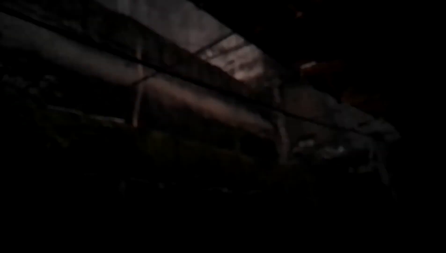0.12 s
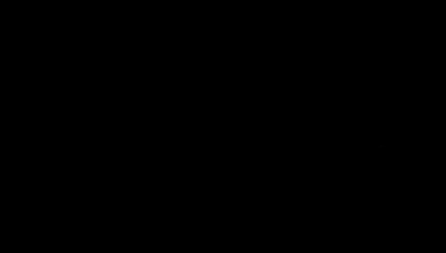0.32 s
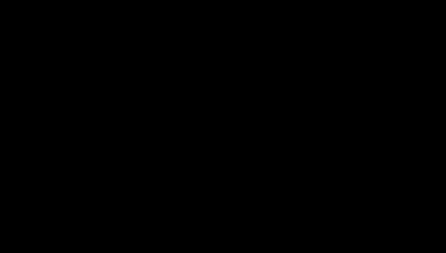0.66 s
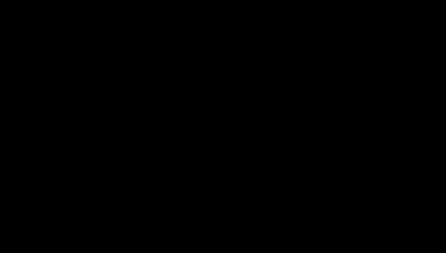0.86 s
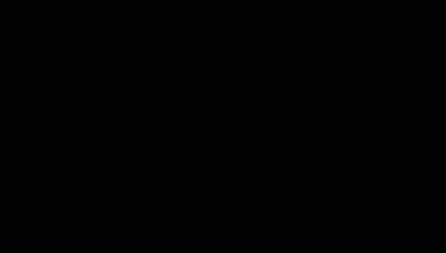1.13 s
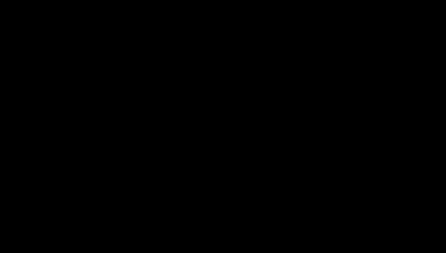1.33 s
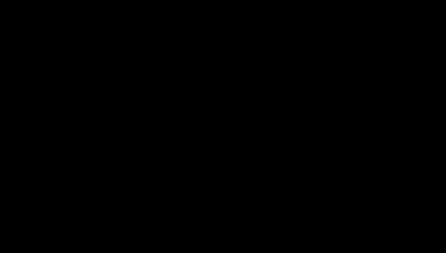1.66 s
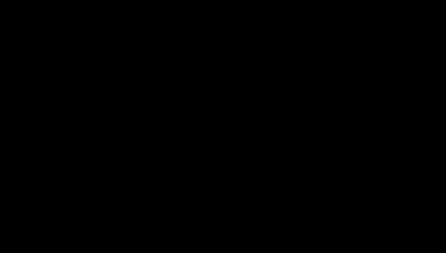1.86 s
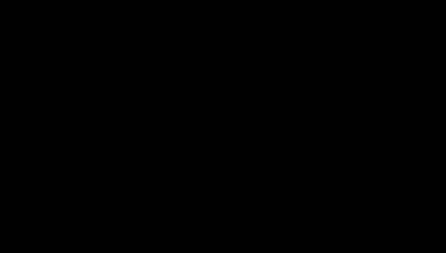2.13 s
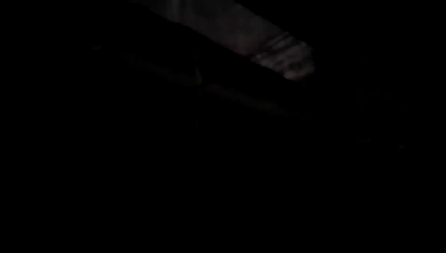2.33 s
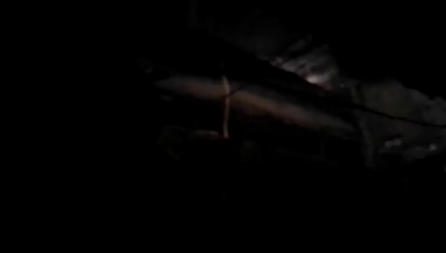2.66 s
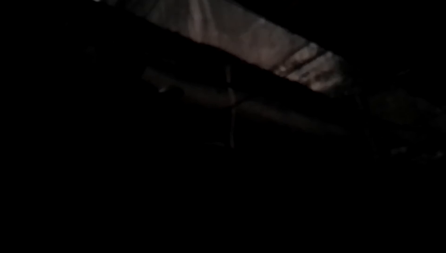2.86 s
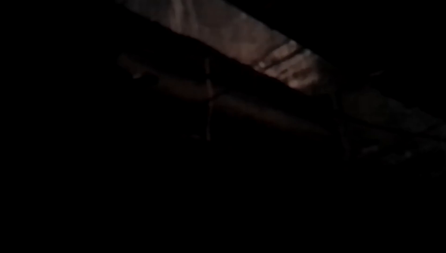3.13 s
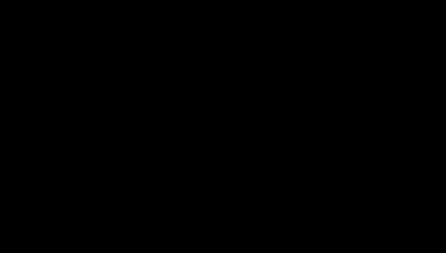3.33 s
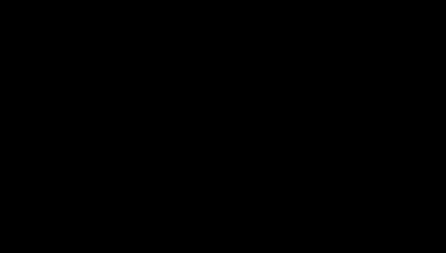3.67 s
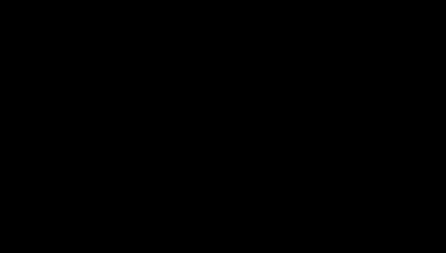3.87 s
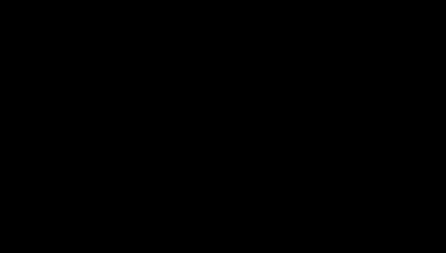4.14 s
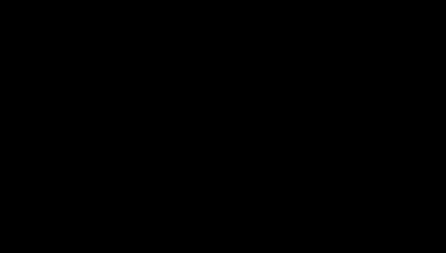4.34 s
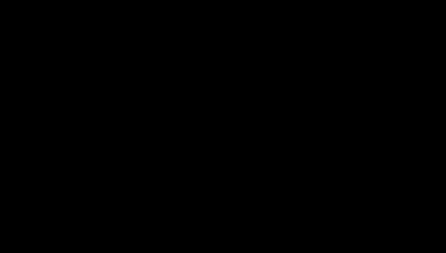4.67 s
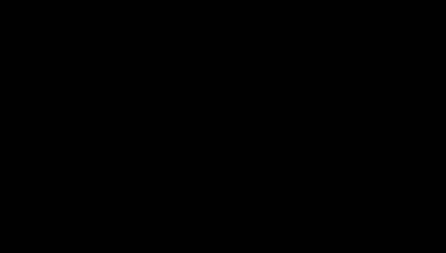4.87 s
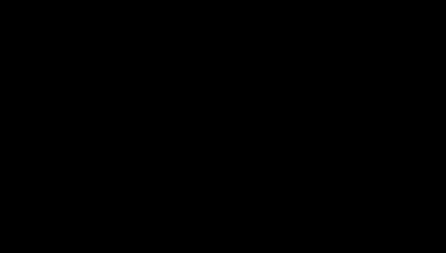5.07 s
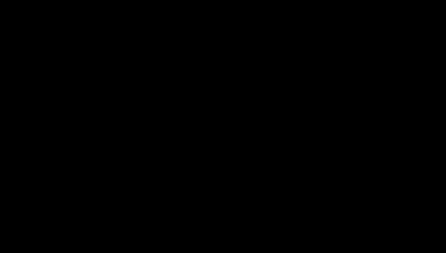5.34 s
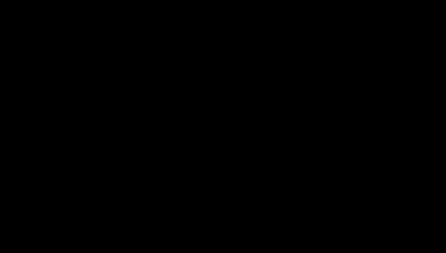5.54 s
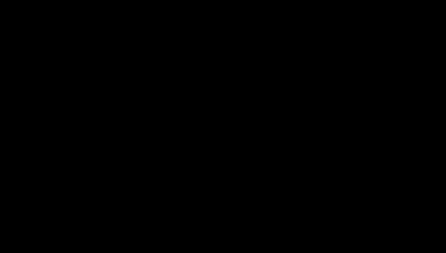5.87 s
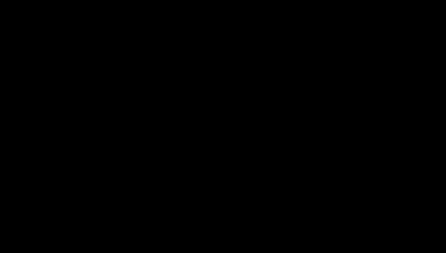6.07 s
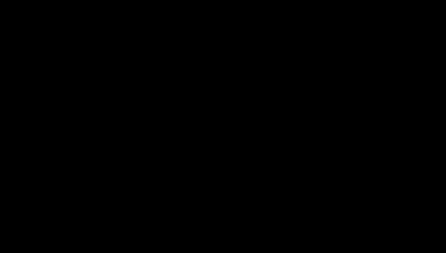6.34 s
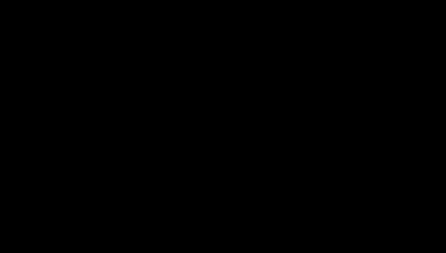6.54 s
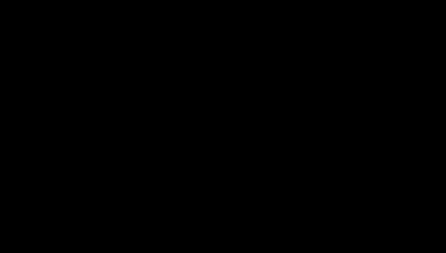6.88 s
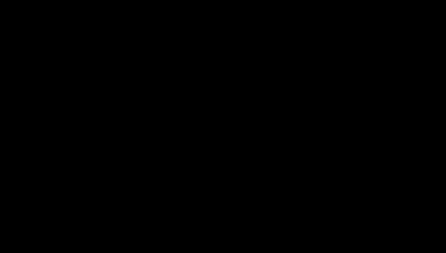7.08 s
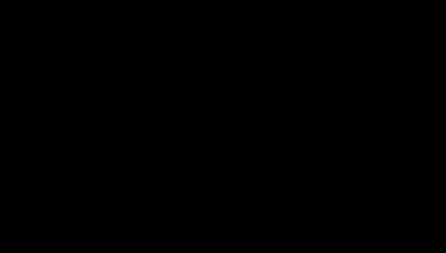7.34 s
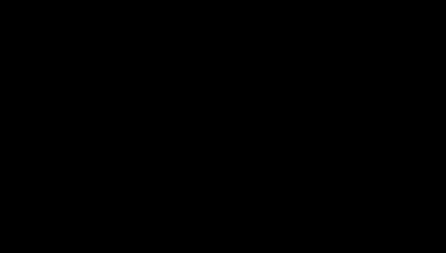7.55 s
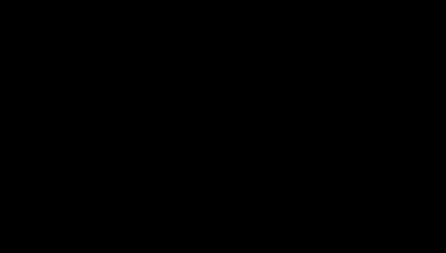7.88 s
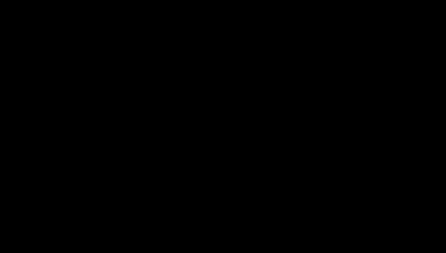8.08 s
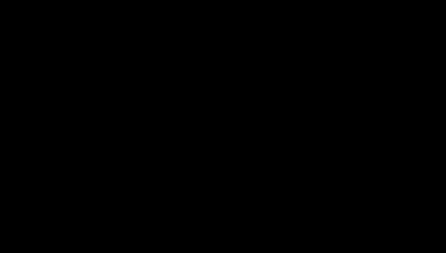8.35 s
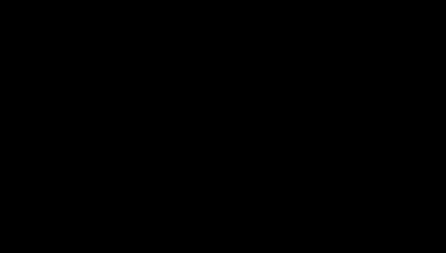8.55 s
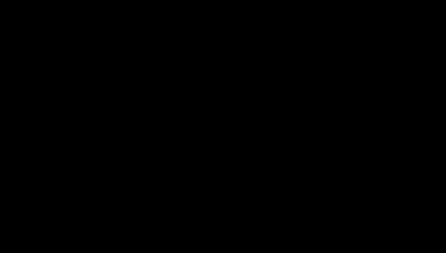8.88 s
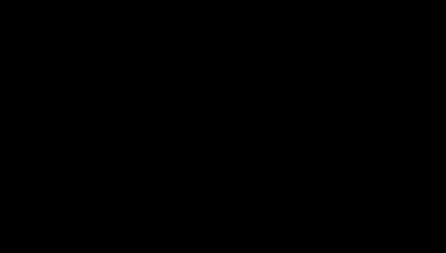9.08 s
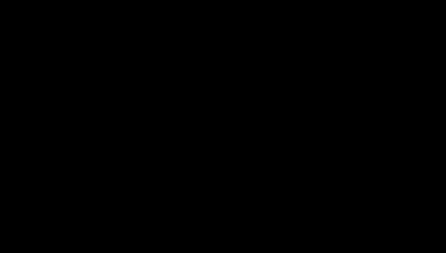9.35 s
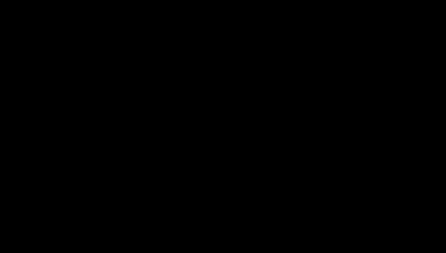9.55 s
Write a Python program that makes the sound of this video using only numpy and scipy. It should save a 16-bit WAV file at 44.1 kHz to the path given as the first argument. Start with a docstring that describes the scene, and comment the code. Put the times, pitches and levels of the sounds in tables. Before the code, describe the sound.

Steady night rain with close, crisp drips, as a low peal of thunder rolls in, dies away and returns in softer rumbles.

```python
"""Steady night rain from a sheltered spot: drips ring close by, over a patter of small drops and a far hiss.
Each drip splats and rings the surface it lands on; the near drops echo off the walls.
Thunder rolls in as scattered low shocks, twice loud and then in soft rumbles; the first roll shakes
something loose, which rattles and clicks. Late on, water spatters briefly on something thin."""
import sys
import numpy as np
from scipy import signal
from scipy.fft import rfft, irfft, next_fast_len
from scipy.io import wavfile
from scipy.ndimage import uniform_filter1d

SR = 44100
rng = np.random.default_rng(int(sys.argv[2]) if len(sys.argv) > 2 else 0)


def pcm_store(signal):
    """Save signal as 16-bit PCM."""
    levels = np.round(np.clip(np.atleast_2d(signal), -1, 1) * 32767)
    wavfile.write(sys.argv[1], SR, levels.astype(np.int16).T)


N = 428211


def undb(db):
    """Decibels to gain."""
    return 10 ** (np.asarray(db) / 20)


def level(x, db):
    """Scale to an rms level."""
    return x * undb(db) / np.sqrt(np.mean(x ** 2))


def equal_energy(rows):
    """Give every row the mean energy of all rows."""
    power = np.mean(rows ** 2, axis=1, keepdims=True)
    return rows * np.sqrt(power.mean() / power)


def colour(x, points):
    """EQ through (Hz, dB) points on a log axis."""
    size = next_fast_len(len(x))
    hz = np.arange(size // 2 + 1) * SR / size + 1
    point_hz, point_db = np.transpose(points)
    curve = undb(np.interp(np.log(hz), np.log(point_hz), point_db))
    return irfft(rfft(x, size) * curve, size)[:len(x)]


def band(x, lo_hz, hi_hz, order=3):
    """Butterworth band-pass."""
    return signal.sosfilt(signal.butter(order, [lo_hz, hi_hz], "band", fs=SR, output="sos"), x)


def ring(x, hz, width_hz):
    """Two like resonators in series, with gain 1 at the centre."""
    peak = signal.iirpeak(hz, hz / max(width_hz, 5), SR)
    return signal.lfilter(*peak, signal.lfilter(*peak, x))


def waver(rate_hz):
    """Random levels held 1 / rate s and smoothed twice; spread near 1."""
    hold = int(SR / rate_hz)
    steps = np.repeat(rng.standard_normal(N // hold + 1), hold)
    return 1.3 * uniform_filter1d(uniform_filter1d(steps, hold), hold)[:N]


def clicks(count, spread_db, top_db=14):
    """Impulses at random moments; the spread makes a few of them large, up to a top."""
    when, polarity, chance = rng.random((count, 3)).T
    size = undb(np.minimum(-spread_db * np.log(1 - chance), top_db))
    out = np.zeros(N)
    np.add.at(out, (when * N).astype(int), np.sign(polarity - .5) * size)
    return out


def decay(x, t60):
    """Give every impulse an exponential tail."""
    return signal.lfilter([1], [1, -np.exp(-np.log(1000) / (t60 * SR))], x)


def swells(starts, levels_db, holds, rise_db_s, fall_db_s):
    """Envelope of overlapping events that rise to their start time, hold and fall."""
    t = np.arange(0, N + 96, 96) / SR
    start, db, hold = (np.asarray(v)[:, None] for v in (starts, levels_db, holds))
    db = db - rise_db_s * np.maximum(start - t, 0) - fall_db_s * np.maximum(t - start - hold, 0)
    return np.interp(np.arange(N) / SR, t, np.sqrt(np.sum(undb(db) ** 2, axis=0)))


def hiss():
    """Far rain: countless drops merged; the treble flickers more than the rest."""
    # tone of the far rain (frequency [Hz], gain [dB])
    eq = [(15, -38), (25, -9), (70, 4.5), (137, 5), (489, -0.5), (840, 3), (2110, -1.5), (2480, -7),
          (3820, -3), (4740, -6.5), (6210, -5.5), (8360, -9), (9570, -17), (14000, -14), (16000, -15.5)]
    out = 0
    for lo_hz in 20 * 2. ** np.arange(10):
        flicker_db = 1.1 if lo_hz > 2000 else .6
        out = out + band(rng.standard_normal(N), lo_hz, 2 * lo_hz) * undb(flicker_db * waver(12))
    return level(colour(out, eq), -55.5)


def patter():
    """Small drops: short noisy splats; some are broad, others sound the small things they land on."""
    # tone of the small drops (frequency [Hz], gain [dB])
    eq = [(700, -13), (1500, 6.5), (2500, 8), (4000, 9), (6500, 10.5), (8500, 3.5), (10000, 5.5),
          (12500, 3), (15500, -19)]
    out = 0
    for lo_hz, hi_hz in [(1500, 2300), (2300, 3100), (3100, 4300), (4300, 5600), (5600, 7000),
                         (7000, 9000), (6000, 16000), (2000, 16000)]:
        impacts = np.abs(clicks(count=800, spread_db=5, top_db=15.5))
        envelope = uniform_filter1d(decay(impacts, t60=0.022), int(0.0018 * SR))
        splats = band(envelope * rng.standard_normal(N), lo_hz, hi_hz, order=2)
        out = out + level(splats, 5 * np.log10(hi_hz - lo_hz))
    return level(colour(out, eq), -56.5)


def thin_object(modes, count, spread_db, t60, sizzle_db, sizzle_hz=(5500, 7200)):
    """Uneven contacts ring the modes of a thin object, over a broad sizzle."""
    contacts = decay(np.abs(clicks(count, spread_db)), t60) * rng.standard_normal(N)
    rings = sum(undb(db) * ring(contacts, hz, width) for hz, width, db in modes)
    return level(rings, 0) + level(band(contacts, *sizzle_hz), sizzle_db)


def rattle():
    """Something loose jolts in the thunder: a clatter, and a high shimmer that dies more slowly."""
    # jolts (time [s], clatter level [dB], hold [s], shimmer level [dB])
    jolts = [(0.404, -58, .02, -65), (0.5, -64, 0.018, -62), (0.584, -55, 0.042, -59.5),
             (0.65, -56, 0.034, -63), (0.736, -48.5, 0.021, -72), (0.777, -60, .03, -66),
             (0.83, -56, 0.044, -52), (0.887, -55, 0.03, -64), (.92, -57, 0.032, -66),
             (0.975, -57, 0.023, -69), (1.028, -66, .02, -70), (1.09, -73, .02, -76), (1.17, -79, .04, -72),
             (1.224, -55, 0.029, -63), (1.36, -61, 0.029, -66), (1.457, -61, .04, -62)]
    # lower modes of the loose object (frequency [Hz], width [Hz], gain [dB])
    clatter_modes = [(1640, 160, -9), (2610, 90, 1), (4010, 75, 10), (4160, 75, 7), (4340, 80, 9),
                     (4700, 80, 9), (4850, 70, 3), (5180, 70, 1), (5460, 100, -2), (5900, 90, -3)]
    # its high modes (frequency [Hz], width [Hz], gain [dB])
    shimmer_modes = [(8310, 140, -6), (9600, 130, -9), (10200, 120, -4), (10820, 90, 2), (11600, 180, -11),
                     (12310, 220, 4), (13000, 120, -2), (14670, 200, -6)]
    start, clatter_db, hold, shimmer_db = np.transpose(jolts)
    clatter = thin_object(clatter_modes, count=6000, spread_db=1.5, t60=.035, sizzle_db=-31)
    shimmer = thin_object(shimmer_modes, count=1800, spread_db=2.5, t60=.04, sizzle_db=-25)
    return (clatter * swells(start, clatter_db, hold, rise_db_s=500, fall_db_s=179)
            + shimmer * swells(start, shimmer_db, hold, rise_db_s=500, fall_db_s=85))


def spatter():
    """Water spatters on something thin in a quick run of bursts."""
    # bursts of water (time [s], level [dB], hold [s])
    bursts = [(7.392, -48, .028), (7.425, -40, 0.026), (7.483, -47, .008), (7.497, -43, .018),
              (7.55, -50, .012), (7.607, -49, .014), (7.677, -54, 0.02), (7.74, -57, 0.01)]
    # modes of what it hits (frequency [Hz], width [Hz], gain [dB])
    modes = [(3150, 200, -12), (3490, 130, -12), (4680, 130, -12), (4980, 130, -8), (5240, 130, -10),
             (5570, 220, -4), (6100, 220, 3), (6390, 160, -2), (6680, 130, -6), (7100, 200, -12),
             (7680, 200, -4), (8240, 150, -15), (8680, 130, -13)]
    spray = thin_object(modes, count=9000, spread_db=1.5, t60=.04, sizzle_db=-7, sizzle_hz=(5000, 7700))
    return spray * swells(*np.transpose(bursts), rise_db_s=3000, fall_db_s=260)


def thunder():
    """Shocks from each bend of the lightning channel, dulled on their way; a jump opens each roll."""
    # tone of the rumble (frequency [Hz], gain [dB])
    eq = [(20, -34), (50, -17), (110, -2), (180, 0), (215, -6), (250, -6), (275, -8), (305, -1), (335, -13),
          (430, -10), (500, -11), (570, -19), (620, -15), (680, -25), (760, -20), (860, -25), (940, -22),
          (1020, -24), (1100, -45)]
    # edges of the deep, bass, low-mid, high-mid and upper bands (frequency [Hz])
    edges = [22, 90, 230, 350, 700, 1050]
    # rolls (time [s], bass level [dB], hold [s], deep, low-mid, high-mid [dB re bass])
    rolls = [(0.0, -48, 0.072, -5, -15.5, -23), (0.161, -47.5, .03, -14, -28, -16),
             (0.225, -44, 0.11, -11, -11.5, -20.5), (0.37, -43, 0.1, -7, 2, -7),
             (0.449, -40.5, 0.073, -14, -14, -7.5), (0.541, -26.5, 0.049, -23, -6.5, -16),
             (.62, -47, 0.11, -12, -9, 0), (0.743, -34, 0.0073, -18, -5.5, -6.5),
             (0.861, -44.5, 0.19, -16, -5, -4.5), (0.993, -38, 0.035, -23, -19, -11),
             (1.058, -33.5, 0.07, -15, -10, -5.5), (1.131, -39.5, 0.048, -16, 1.5, 1),
             (1.216, -46, .04, -12, -7, -6), (1.28, -53.5, 0.1, -1, 2.5, 1),
             (1.428, -49, 0.077, -21, -10, -25), (2.66, -64.5, 0.16, -18, -8, -19),
             (2.943, -54, 0.053, 1, -18, -10.5), (3.008, -50, 0.073, -16, -16, -37),
             (3.12, -52, 0.042, -15, -27, -19), (3.329, -48, 0.066, -21, -31, -21),
             (3.446, -51.5, 0.16, -12, -23, -34), (3.669, -42.5, 0.063, -9, -13.5, -21),
             (3.76, -47.5, 0.07, -7, -4.5, -23), (3.829, -44.5, 0.075, -24, -5.5, -25),
             (3.969, -43, 0.042, -17, -16, -28), (4.15, -60.5, 0.03, 9, -2, 2),
             (4.209, -54, 0.047, -9, 7, -1), (4.318, -46.5, 0.026, -22, -3.5, -32),
             (4.411, -56.5, 0.034, -17, -20, -11), (4.729, -64.5, .02, 2, -14, -2),
             (4.95, -57, 0.059, 4, -27, -8), (5.031, -49, 0.019, -8, -36, -27),
             (5.13, -49, 0.03, -3, -18, -23), (5.21, -48.5, .02, -21, -20, -27),
             (5.29, -72, .03, -9, -19, -15), (6.1, -73, 0.053, -13, 6, -30),
             (6.38, -65.5, 0.14, -18, -6, -30), (7.18, -63, 0.016, -11, -7, -30),
             (7.379, -67.5, 0.038, -1, 4, -30), (7.72, -58, 0.034, -10, -8, -28),
             (8.75, -71, 0.12, -15, 1, -32), (9.3, -60.5, 0.044, -25, -10, -36)]
    # late arrival of each band, deep to high-mid (delay [s])
    lags = [0.033, 0.00079, 0.012, 0.032]
    # release of each band, deep to high-mid (fall [dB/s])
    falls = [112, 140, 135, 129]
    # tearing upper band of the two loud rolls (time [s], level [dB])
    tearing = [(0.3, -87), (0.328, -73), (0.404, -80), (0.418, -57), (0.506, -72), (0.62, -49.5),
               (.7, -54.5), (.79, -55.5), (0.868, -72), (0.91, -83), (0.936, -76), (1.07, -87),
               (1.082, -78), (1.176, -54.5), (1.328, -51.5), (1.42, -58), (1.6, -92)]
    shocks = colour(clicks(count=8000, spread_db=0), eq)
    start, bass_db, hold, deep_db, low_mid_db, high_mid_db = np.transpose(rolls)
    levels_db = [bass_db + deep_db, bass_db, bass_db + low_mid_db, bass_db + high_mid_db]
    envelopes = [swells(start + lag, db, hold, rise_db_s=900, fall_db_s=fall)
                 for db, lag, fall in zip(levels_db, lags, falls)]
    envelopes.append(undb(np.interp(np.arange(N) / SR, *np.transpose(tearing))))
    jump_s, lead_s = 0.0093, 0.00744  # the pressure jump comes just ahead of its roll
    fronts = np.zeros(N)
    fronts[(np.maximum(start - lead_s, 0) * SR).astype(int)] = undb(bass_db + 3.5)
    jumps = np.convolve(fronts, np.linspace(-1, 1, int(jump_s * SR)))[:N]
    out = band(jumps, 77, 180, order=2)
    for lo_hz, hi_hz, envelope in zip(edges, edges[1:], envelopes):
        rumble = band(shocks, lo_hz, hi_hz, order=5)
        steady = rumble / np.sqrt(uniform_filter1d(rumble ** 2, SR // 10))
        out = out + steady * undb(1.2 * waver(15)) * envelope
    return out


def lingering_rings():
    """Something thin keeps singing unevenly after some drips."""
    # ring tails (time [s], pitch [Hz], level [dB], t60 [s])
    tails = [(1.168, 2650, -66, 0.28), (1.383, 4080, -66, 0.58), (3.011, 4040, -46, 0.55),
             (3.013, 1610, -50, 0.36), (3.045, 1590, -51, 0.24), (3.036, 2170, -57, 0.26),
             (3.036, 3200, -53, 0.34), (3.013, 2160, -45, 0.22), (4.68, 5230, -52, 0.6),
             (4.83, 9500, -67, 0.8), (6.34, 2550, -54, 0.34), (6.409, 2620, -61, 0.61),
             (6.562, 6100, -62, 0.38), (6.559, 1770, -54, 0.16), (6.723, 1600, -61, 0.57),
             (6.769, 1650, -60, 0.46), (6.81, 1620, -57, .3), (8.214, 3820, -53, 0.37),
             (8.428, 5450, -59, 1)]
    out, t = np.zeros(N + SR), np.arange(SR // 2) / SR
    for start, hz, db, t60 in tails:
        tone = level(ring(rng.standard_normal(len(t)), hz, width_hz=230), db)
        attack = np.minimum(t / 0.005, 1)
        out[int(start * SR):][:len(t)] += tone * attack * undb(-60 * t / t60)
    return out[:N] * undb(4.5 * waver(60))


def snaps():
    """Some drips land with a hard snap: a few cycles that swell at once and are gone."""
    # hard landings (time [s], peak [dB], pitch [Hz])
    landings = [(2.3622, -31, 3000), (2.909, -23, 3600), (3.0112, -31, 4500), (3.3052, -29, 3200),
                (3.9095, -30, 4500), (4.337, -32, 3900), (4.6545, -32, 5000), (4.801, -29, 9000),
                (4.9785, -35, 4500), (5.1618, -36, 3500), (5.4593, -32, 7800), (6.7215, -36, 3500),
                (6.7485, -35, 3200), (6.8655, -35, 8200), (7.4255, -28, 6000), (7.5105, -29, 6200),
                (8.9415, -37, 7500), (9.1422, -35, 5500), (9.4615, -33, 3600)]
    rise_cycles, t60_cycles = 3, 20
    out, t = np.zeros(N), np.arange(SR // 50) / SR
    for start, db, hz in landings:
        cycles = hz * t
        attack = np.sin(np.pi / 2 * np.minimum(cycles / rise_cycles, 1)) ** 2
        fall_db = 60 * np.maximum(cycles - rise_cycles, 0) / t60_cycles
        out[int(start * SR):][:len(t)] += undb(db - fall_db) * attack * np.sin(2 * np.pi * cycles)
    return out


def struck_surface(bursts):
    """Each hit sounds the modes of the surface, each mode as strongly as the spot struck allows."""
    # modes of the struck surface (frequency [Hz], width [Hz])
    modes = [(1630, 130), (2170, 140), (2610, 130), (3100, 170), (3480, 130), (3780, 130), (4030, 100),
             (4330, 100), (4700, 110), (5240, 160), (5600, 200), (6100, 180), (6700, 220), (7680, 250),
             (8400, 350), (10200, 350), (10900, 350), (12310, 350)]
    size = next_fast_len(bursts.shape[1])
    hz = np.arange(size // 2 + 1) * SR / size
    centre, width = np.transpose(modes)[:, :, None]
    responses = 1 / (1 + 2j * (hz - centre) / width)
    spot_gains = undb(rng.normal(7, 7, (len(bursts), len(centre))))
    return irfft(rfft(bursts, size) * (1 + spot_gains @ responses), size)[:, :bursts.shape[1]]


def drips_and_rattle_clicks():
    """Close drips, plus the loose object's clicks in the first thunder: each a noisy tick and a ring."""
    # hits (time [s], level [dB], ring pitch [Hz], trims for dull, crisp, bright and ring [dB]);
    # those from about 0.55 to 1.05 s that ring near 4-4.8 kHz are rattle contacts
    hits = [(0.026, -26.5, 6100, -34, -28, -18, -3), (0.0578, -31.5, 4450, -28, -31, -34, -2.5),
            (0.115, -33, 5100, -23, -18, -15, 1), (0.196, -40, 3980, -9, -21, -19, -3),
            (0.215, -39, 4440, -15, -13, -20, -1), (0.2306, -39, 2640, -17, -25, -25, 6),
            (0.23, -40, 4040, -13, -19, -18, 6), (0.295, -24, 6340, -41, -13.5, -18, -10),
            (0.38, -37.5, 1570, -28, -17, -17, -0.5), (0.397, -30, 5100, -12, -14, -8, -4),
            (0.424, -38, 6600, -6, -20, -6, -2), (0.4828, -37, 5670, -25, -5, -10, 1),
            (0.5541, -38, 4570, -18, -19, -17, 3), (0.573, -32, 4000, -10, -20, -22, -2),
            (0.6256, -29.5, 4070, -11, -18, -13, -1.5), (.6406, -40, 6110, -19, -10, -19, -5),
            (0.689, -38, 4800, -30, -7, -23, 6.5), (0.7213, -24.5, 4270, -26, -19, -17, 0.5),
            (0.7392, -32, 4020, -7, -30, -25, -1), (0.7574, -31.5, 4320, -26, -25, -6, 2),
            (0.8278, -26, 4240, -17, -6, -2.5, 0), (0.858, -29.5, 4370, -36, -9, -5, 1),
            (0.902, -33, 4580, -14, -22, -11, 0), (0.922, -35, 4340, -24, -23, -8, 4),
            (.9458, -40, 4700, -18, -21, -17, 1), (0.976, -24, 4300, -27, -24, -10, -5),
            (.977, -36.5, 2650, -13, -25, -25, 3), (0.9887, -36, 4630, -18, -19, -25, 5),
            (1.028, -38, 4700, -6, -28, -19, 4), (1.094, -32.5, 5050, -17, -9, -9.5, -6),
            (1.214, -33, 2620, -21, -18, -11, -4), (1.238, -31, 2600, -19, -11, -13, -8),
            (1.2762, -28, 2560, -26, -14, -5, -11), (1.369, -32, 6000, -15, -4, -3, -7),
            (1.3905, -40, 5600, -25, -8, -21, -3), (1.399, -36, 4030, -30, -19, -19, 5),
            (1.444, -32.5, 3930, -28, -4, -4, -5), (1.5017, -35.5, 4300, -4, -18, -13, -4),
            (1.705, -39, 5400, -21, -4, -20, -1), (1.7996, -32, 2600, -20, -20, -16, -7),
            (1.845, -43, 7070, -20, -8, -10, -9), (1.913, -21.5, 4000, -22, -22, -24, -11),
            (1.9809, -34, 2670, -8, -7, -31, -5), (2.026, -39, 4630, -7, -23, -6, -1),
            (2.073, -35, 5500, -15, -16, -21, -3), (2.1127, -32, 1750, -16, -13, -21, -12),
            (2.1297, -33.5, 1520, -13, -10, -17, -8), (2.172, -32, 4580, -9, -14, -20, -5),
            (2.1993, -35, 5500, -20, -14, -25, -7), (2.25, -31.5, 5260, -19, -12, -13, -5),
            (2.2924, -49, 5140, -14, -14, -15, -11), (2.362, -27.5, 2520, -12.5, -4, -8, -4.5),
            (2.4235, -29.5, 3700, -19, -11, -12.5, -10), (2.4578, -29, 2270, -18, -20, -29, -8),
            (2.476, -29, 2530, -29, -21, -31, -5.5), (2.5473, -38, 4270, -26, -8, -28, 1),
            (2.588, -29, 3420, -7, -10, -22, -8), (2.637, -36, 5440, -14, -15, -10, -7),
            (2.693, -34.5, 4960, -17, -7, -11, -7), (2.7436, -32.5, 2370, -11, -9, -13, -4),
            (2.8575, -36.5, 3400, -22, -6, -7, -8), (2.9085, -26, 3700, -43, -15, -13, 1),
            (2.962, -33, 3720, -28, -9, -10, -6), (2.976, -33, 3870, -17, -16, -22, -1),
            (3.0103, -23, 4020, -9, -21, -33, -5), (3.035, -23, 4000, -10, -24, -25, -5),
            (3.1407, -37, 4000, -18, -9, -10, 3), (3.1757, -39.5, 3680, -1, -18, -26, -12),
            (3.233, -30, 3070, -14, -22, -14, -9), (3.306, -23, 2860, -20, -20, -19.5, -19),
            (3.377, -31.5, 3770, -20, -17, -15, -6), (3.4368, -39, 3800, -15, -7, -8, -11),
            (3.4796, -30, 4100, -21, -16, -15, -7), (3.5, -34, 3880, -19, -19, -7, -10),
            (3.5346, -32, 2600, -8, -24, -9, -6), (3.5554, -39, 6460, -21, -8, -4, -3),
            (3.5946, -30, 3560, -11, -14, -7.5, -3.5), (3.659, -29.5, 3500, -11, -15, -22, -8),
            (3.7215, -29.5, 1450, -13, -34, -33, -16), (3.766, -32.5, 4040, -14, -12, -15, -6),
            (3.805, -33, 6400, -15, -10, -31, -5), (3.8226, -44, 6920, -18, -8, -24, -4),
            (3.834, -40, 3560, -16, -17, -25, -2), (3.91, -30.5, 4500, -11, -6, -18, -11),
            (4.016, -42, 4020, -14, -11, -8, -4), (4.163, -32, 4100, -9, -14, -20, -3.5),
            (4.224, -35.5, 5570, -10, -5, -12, 3), (4.2663, -32.5, 5140, -12, -15, -14, -6),
            (4.3247, -31, 6600, -16, -19, -19, -2), (4.334, -26, 3970, -10, -8, -13.5, -6),
            (4.482, -38, 5460, -10, -10, -12, -7), (4.601, -33, 3720, -20, -13, -31, -7),
            (4.6275, -39, 2070, -16, -9, -13, -5), (4.6545, -28, 4900, -25, -14, -28, -7),
            (4.679, -28.5, 4850, -10, -14, -21, -1), (4.742, -43, 5170, -19, -14, -25, -9),
            (4.7752, -28.5, 2200, -9, -15, -21, -4), (4.7984, -35, 3700, -24, -15, -13, -14),
            (4.819, -35, 2520, -15, -20, -11, -4), (4.83, -31, 2120, -10.5, -16, -11, -11),
            (4.949, -43, 4940, -4, -21, -24, -3), (4.9622, -37, 1440, -1, -13, -13, -3),
            (4.979, -36, 5460, -20, -3, -5, -14), (5.039, -41, 1800, -24, -4, -12, -3),
            (5.1446, -27.5, 4180, -15, -24, -16, -5.5), (5.161, -28, 3450, -8, -28, -32, -10),
            (5.2424, -30.5, 2110, -14, -19, -26, -8), (5.2726, -38.5, 3020, -1, -23, -18, -4),
            (5.3893, -27.5, 1730, -27, -15, -16, -11), (5.458, -30, 6410, -17, -12, -10, -12),
            (5.534, -21, 2400, -16.5, -19, -17, -8.5), (5.682, -31, 5950, -13, -15, -15, -6),
            (5.7112, -30.5, 4680, -9, -24, -16, -10), (5.7524, -34.5, 6040, -20, -11, -27, -4),
            (5.857, -31.5, 4270, -24, -17, -11, -4), (5.899, -35, 6100, -12, -9, -14, -1),
            (5.9572, -43, 5660, -28, -4, -22, 7), (6.032, -24.5, 2090, -15, -18, -25, -11),
            (6.087, -24, 4160, -13, -19, -31, -16), (6.1447, -34, 6160, -10, -11, -13, -12),
            (6.1703, -34.5, 1680, -12, -18, -11, -15), (6.201, -35.5, 2310, -10, -22, -24, -2.5),
            (6.2275, -31, 3850, -14, -19, -25, -6), (6.3, -34, 5900, -10, -14, -24, -7),
            (6.3374, -35, 2190, -13, -7, -12, -8), (6.364, -34, 4070, -11, -13, -24, -2),
            (6.379, -31, 4020, -8, -11, -31, -3), (6.4066, -30, 2700, -15, -11, -25, -3.5),
            (6.455, -32.5, 7150, -11, -8, -19, -4), (6.4727, -32, 2660, -7, -6, -26, -8),
            (6.5286, -33, 6070, -13, -8, -20, -2), (6.555, -34, 6150, -14, 3, -7.5, -2),
            (6.63, -39, 6080, -16, -17, -17, -3), (6.6567, -38, 6650, -12, -10, -24, -4),
            (6.668, -35.5, 6800, -5, -6, -21, -6), (6.686, -38, 3720, -17, -9, -29, 2),
            (6.7211, -28.5, 1630, -4, -18, -24, -12), (6.72, -39, 3750, -16, -27, -30, 4),
            (6.722, -44, 2570, -20, -25, -30, 2), (6.747, -26, 1630, -13, -11, -23, -8),
            (6.811, -34, 1590, -12, -11, -9, -6), (6.826, -37, 5800, -18, -12, -25, -2),
            (6.8636, -30, 3050, -15, -16, -18, -7), (6.911, -33.5, 5300, -11, -9, -15, -4),
            (7.006, -33, 3080, -6, -15, -14, 2), (7.03, -37, 3030, -11, -12, -9, -3),
            (7.101, -34, 3850, -5.5, -6, -13, -2), (7.158, -36.5, 4270, -12, -7, -9, -9),
            (7.193, -32.5, 2860, -7, -12, -6, -2), (7.391, -21, 3230, -12, -11, -21, -11),
            (7.426, -19, 5990, -21, -9, -23, -16), (7.48, -26, 6130, -16, -19, -33, -10),
            (7.5077, -33, 6370, -29, -24, -33, 0), (7.554, -31, 6070, -16, -28, -29, -5),
            (7.5815, -47, 5720, -25, -11, -21, -7), (7.6043, -33, 3650, -19, -17, -29, -1),
            (7.679, -31.5, 6260, -12, -7, -19, -3), (7.7414, -36, 6340, -9, -19, -24, -6),
            (7.76, -29.5, 3400, -8.5, -8, -17, -3), (7.831, -32, 6400, -18, -13, -28, -10),
            (7.913, -31.5, 1600, -12, -10, -18, -12), (8.019, -36, 3800, -12, -5, -26, -5),
            (8.032, -33, 3980, -13, -9, -15, -4), (8.0465, -26, 3750, -10, -14, -37, -5),
            (8.081, -37, 6060, -10, 0, -20, -13), (8.1077, -37, 5440, -20, -10, -26, -4),
            (8.1197, -38.5, 6190, -12, -8, -15, 2), (8.1523, -41, 1890, -8, -18, -23, 2),
            (8.172, -33, 3050, 1, -6, -13, -6), (8.215, -30, 4000, -8, -7, -20, -8),
            (8.402, -37, 6320, -3, -4, -13, -8), (8.4178, -46, 5940, -14, -5, -11, -2),
            (8.432, -28.5, 2220, -6, -16, -23, -3.5), (8.465, -27, 3840, -13, -11, -16, -3),
            (8.546, -33, 5330, -32, -3.5, -17, -2), (8.6083, -36, 5340, -20, -10, -17, -10),
            (8.655, -36.5, 6800, -17, -4, -4, -11), (8.748, -36, 6200, -10, -0.5, -15, -6),
            (8.7638, -35, 6090, -16, -16, -24, -2), (8.7891, -31, 6780, -21, -13, -22, -8),
            (8.8275, -39, 5160, -15, -16, -23, -6), (8.8417, -32.5, 2530, -14, -9, -19, -13),
            (8.8752, -29, 6300, -15, -10, -22, -7), (8.904, -36, 3200, -12, -6, -16, -1),
            (8.941, -41, 3400, -22, -9, -24, -4), (8.952, -36, 3300, -12, -16, -19, -12),
            (8.982, -21, 4400, -17.5, -11.5, -20, -9), (9.0309, -35, 6240, -12, -14, -18, -7),
            (9.1042, -39.5, 2030, -1, -13, -13, -4), (9.115, -43, 7200, -11, -9, -15, -10),
            (9.1307, -31.5, 2300, -13.5, -15, -13, -8), (9.1402, -34, 3370, -19, -13, -10, -10),
            (9.198, -41, 1630, -18, -9, -13, -8), (9.282, -28, 6270, -10, -6.5, -14, -12),
            (9.406, -44, 4780, -18, -10, 1, -15), (9.4482, -37, 1660, -15, -12, -20, -9),
            (9.4604, -25.5, 3630, -11.5, -25, -20, -13), (9.5456, -42, 2290, -13, -16, -6, -4),
            (9.612, -34, 4740, -3, -10.5, -12.5, -7)]
    # edges of the dull, middle, crisp and bright bands (frequency [Hz])
    edges = [1400, 3200, 5500, 8500, 14600]
    rise_s, ring_t60, knock_t60 = .0024, 0.091, 0.012
    bright_fall_db_s = 350  # the bright band dies sooner
    out, t = np.zeros(N + SR), np.arange(SR // 8) / SR
    start, db, pitch, dull_db, crisp_db, bright_db, ring_db = np.transpose(hits)[:, :, None]
    impact_noise, ring_noise = rng.standard_normal((len(hits), 2, len(t))).swapaxes(0, 1)
    middle_db = rng.normal(-12, 1.5, (len(hits), 1))
    attack = np.minimum(t / rise_s, 1)
    tick = undb(10 - 60 * t / 0.0057) + undb(-60 * t / 0.0051)
    tail = undb(-9.5 - 60 * t / 0.14)
    bursts = struck_surface(impact_noise * attack * (tick + tail))
    trims_db = [dull_db + 7.5, middle_db + 7.5, crisp_db + 7, bright_db + 5.5 - bright_fall_db_s * t]
    impacts = sum(undb(trim) * equal_energy(band(bursts, lo_hz, hi_hz, order=4))
                  for trim, lo_hz, hi_hz in zip(trims_db, edges, edges[1:]))
    tones = np.array([level(ring(noise, hz, .1 * hz), 0) for noise, hz in zip(ring_noise, pitch[:, 0])])
    fade = undb(-60 * t / ring_t60) + undb(8 - 60 * t / knock_t60)  # the ring opens with a knock
    rings = equal_energy(tones * attack * fade) * undb(ring_db)
    for at, hit in zip((start[:, 0] * SR).astype(int), undb(db - 13.5) * (impacts + rings)):
        out[at:at + len(t)] += hit
    return out[:N]


def scene():
    """Mono mix: drips, rattle clicks, snaps and patter echo off the walls; the rest stays dry."""
    # reflections off nearby walls (delay [s], gain [dB])
    walls = [(.004, -25), (0.009, -20), (.027, -19.5), (0.029, -33)]
    near = drips_and_rattle_clicks() + snaps() + patter()
    echoes = sum(undb(db) * np.roll(near, int(delay * SR)) for delay, db in walls)
    return (near + echoes + lingering_rings() + thunder() + rattle() + spatter() + hiss())[None]


def record(dry):
    """A steep low-pass takes off the very top."""
    top_hz = 15900
    return signal.sosfilt(signal.ellip(8, .2, 70, top_hz, fs=SR, output="sos"), dry)


dry = scene()
out = record(dry)
pcm_store(out)
```